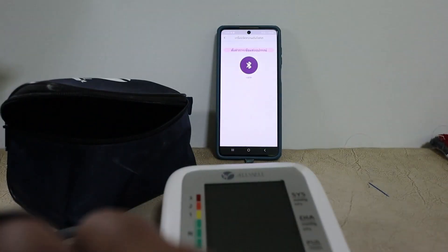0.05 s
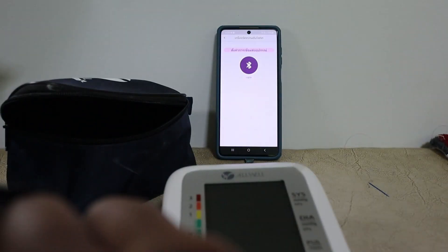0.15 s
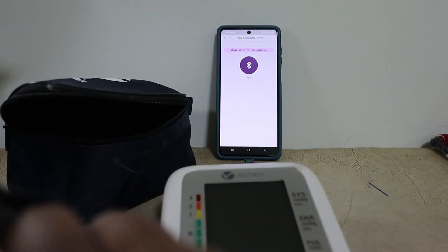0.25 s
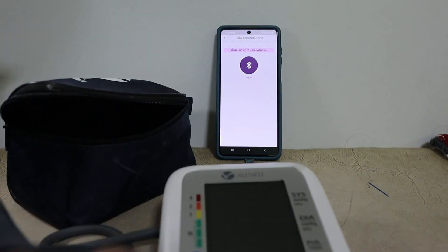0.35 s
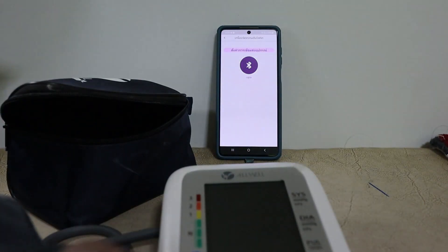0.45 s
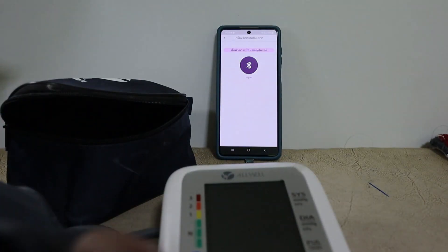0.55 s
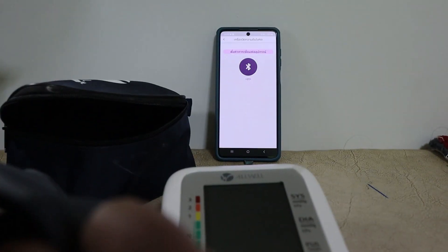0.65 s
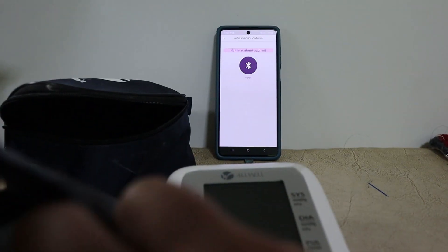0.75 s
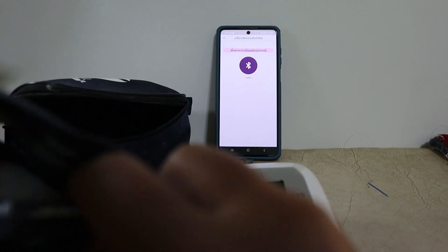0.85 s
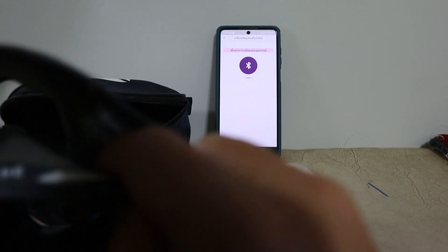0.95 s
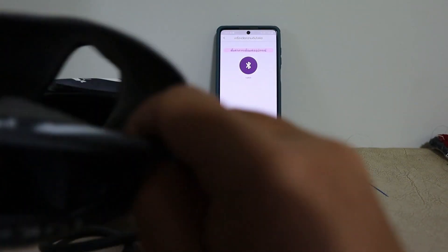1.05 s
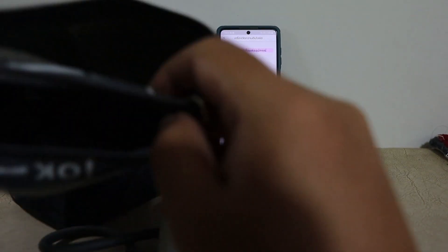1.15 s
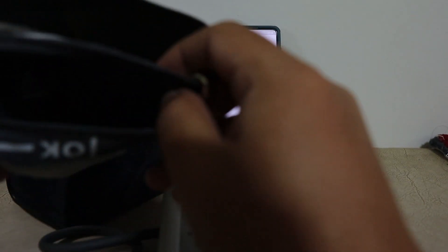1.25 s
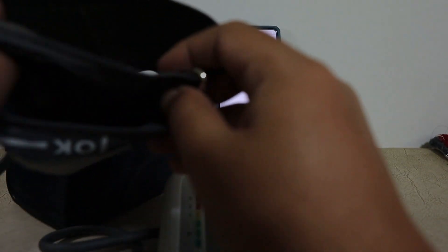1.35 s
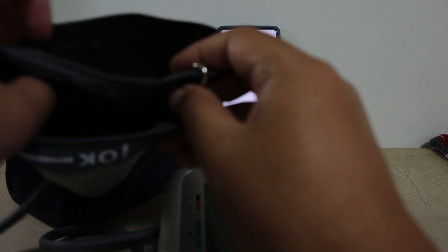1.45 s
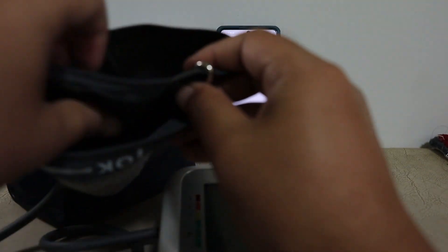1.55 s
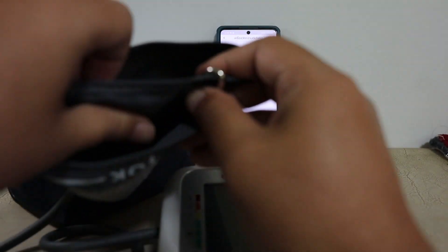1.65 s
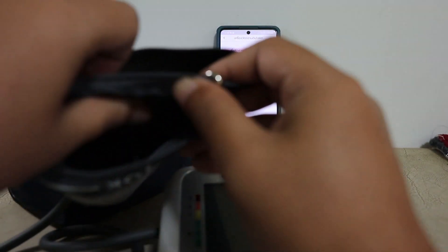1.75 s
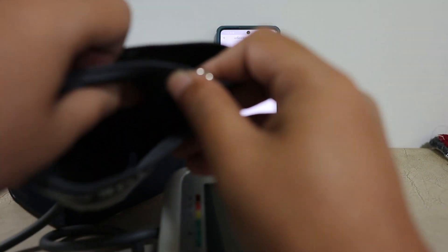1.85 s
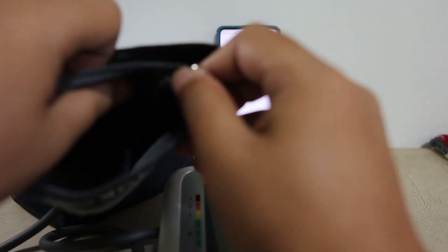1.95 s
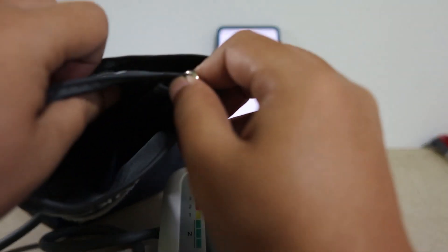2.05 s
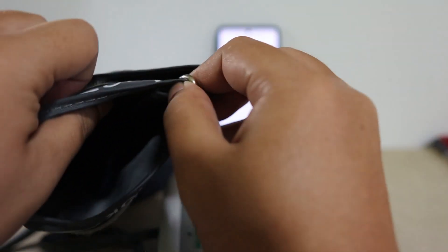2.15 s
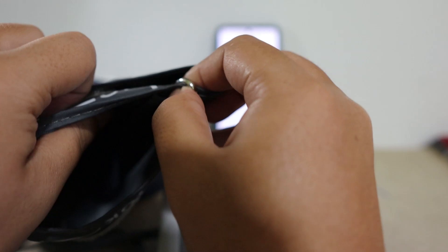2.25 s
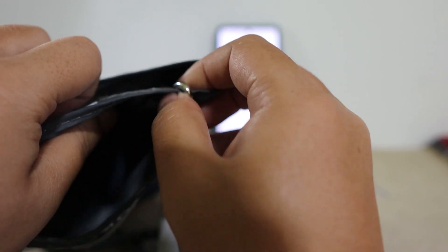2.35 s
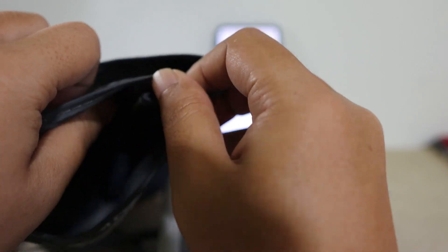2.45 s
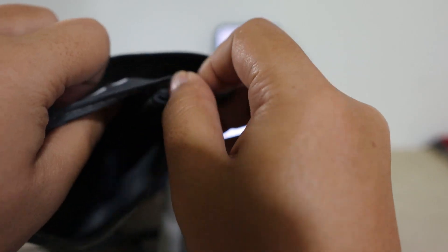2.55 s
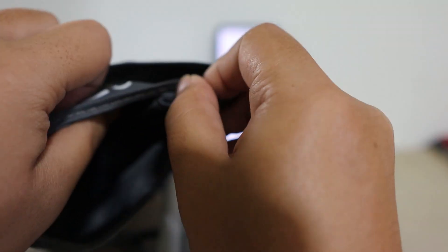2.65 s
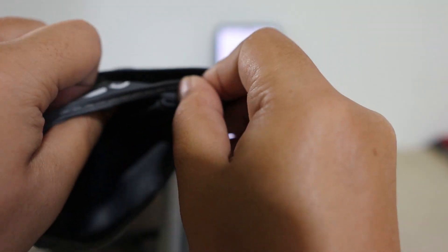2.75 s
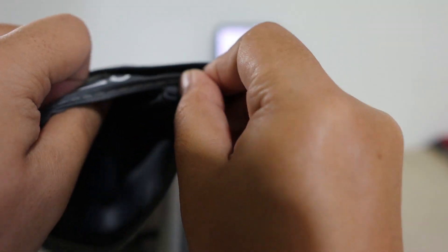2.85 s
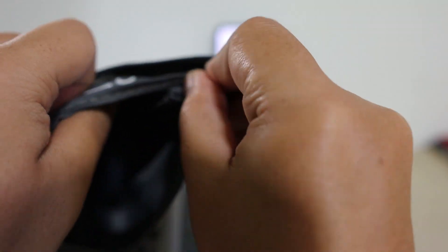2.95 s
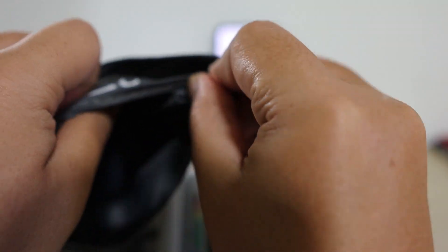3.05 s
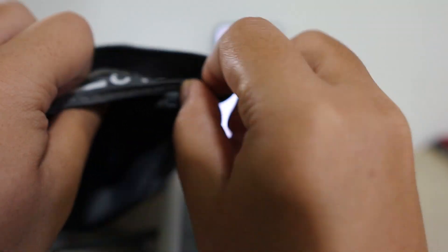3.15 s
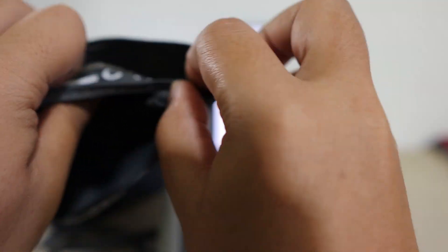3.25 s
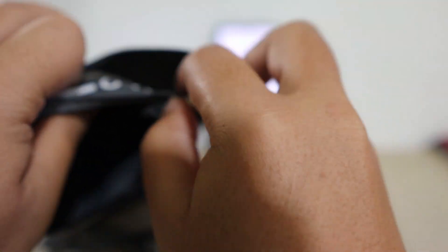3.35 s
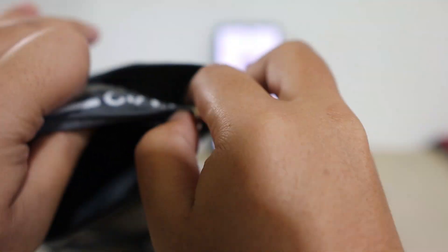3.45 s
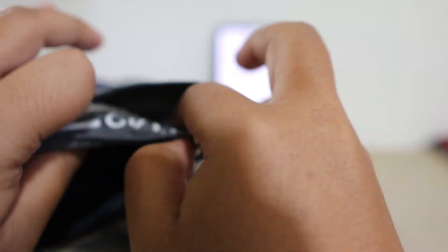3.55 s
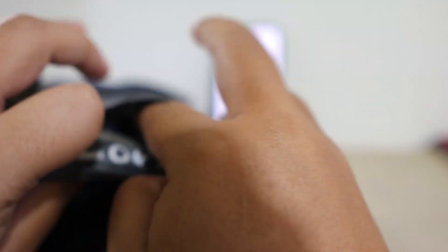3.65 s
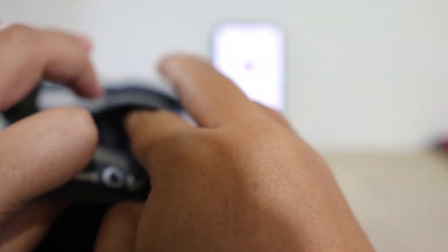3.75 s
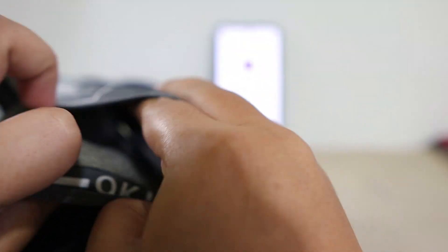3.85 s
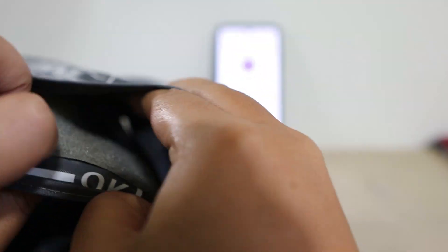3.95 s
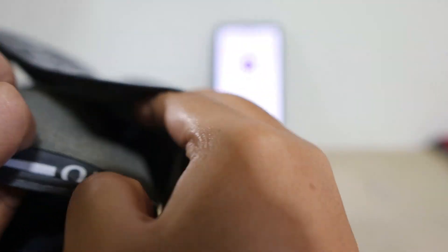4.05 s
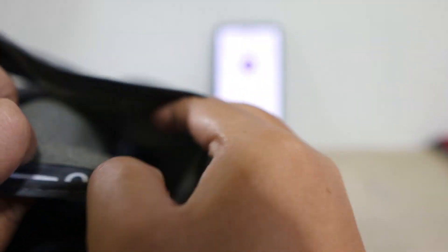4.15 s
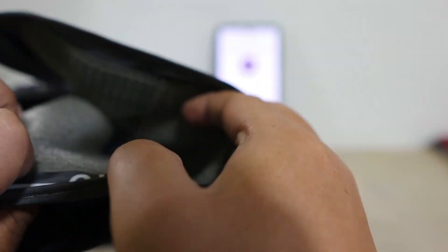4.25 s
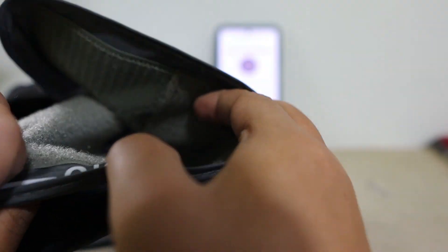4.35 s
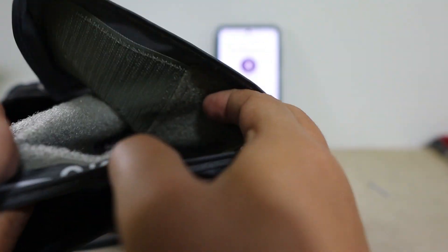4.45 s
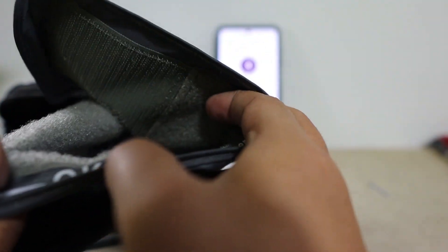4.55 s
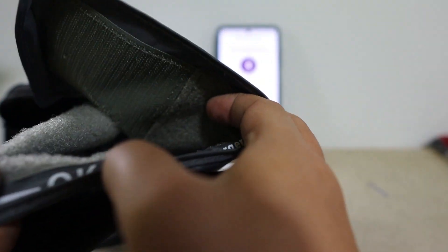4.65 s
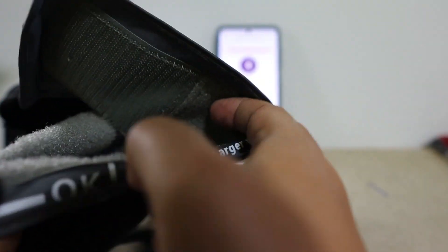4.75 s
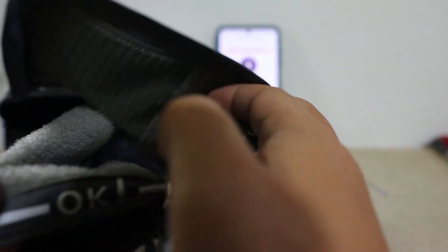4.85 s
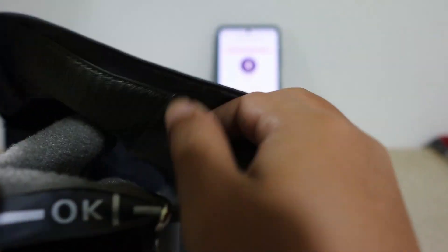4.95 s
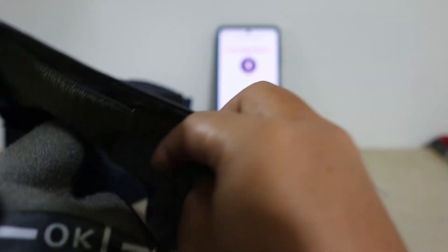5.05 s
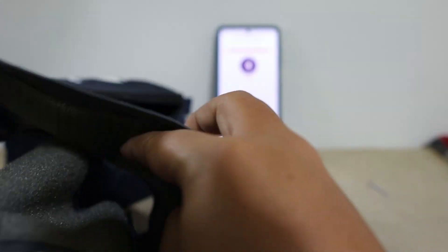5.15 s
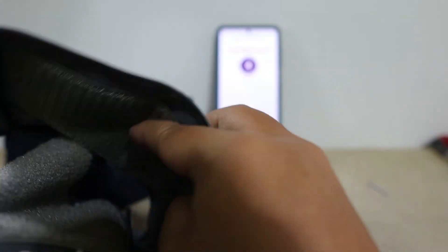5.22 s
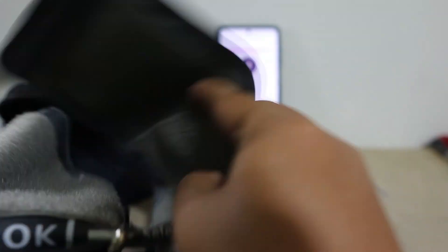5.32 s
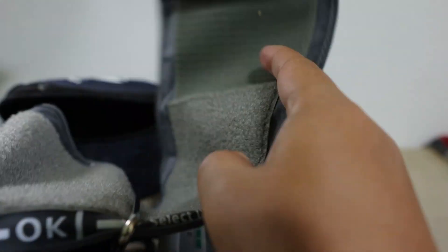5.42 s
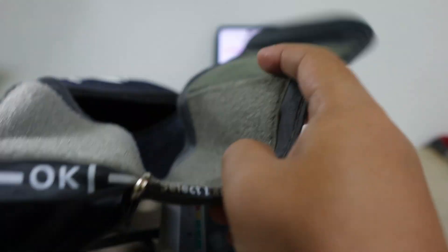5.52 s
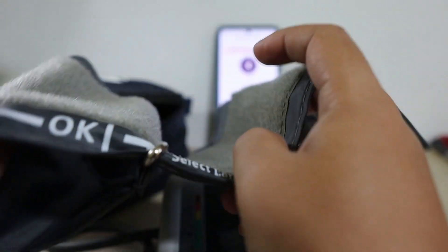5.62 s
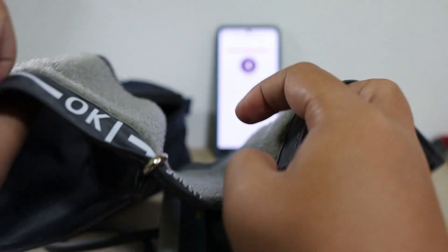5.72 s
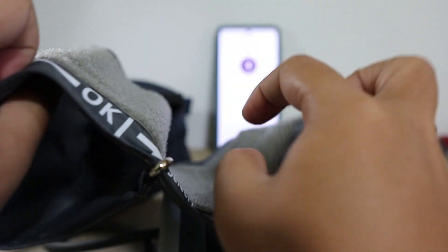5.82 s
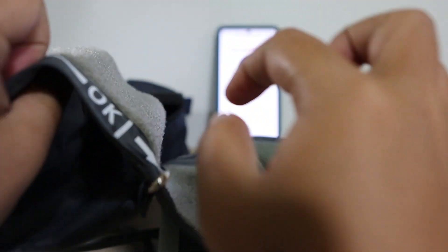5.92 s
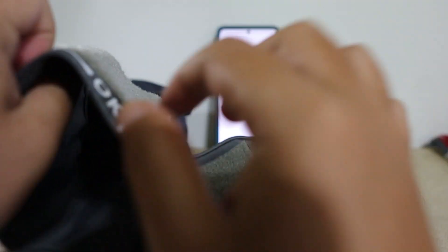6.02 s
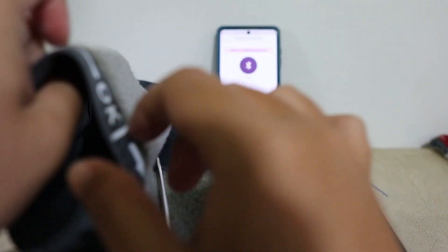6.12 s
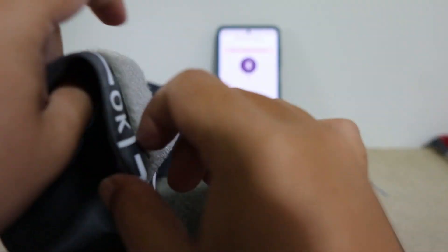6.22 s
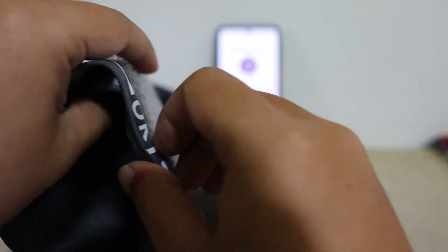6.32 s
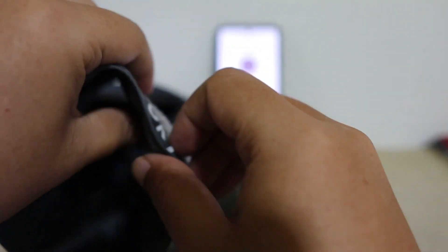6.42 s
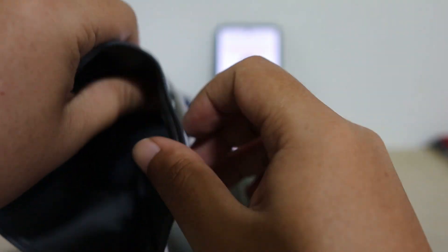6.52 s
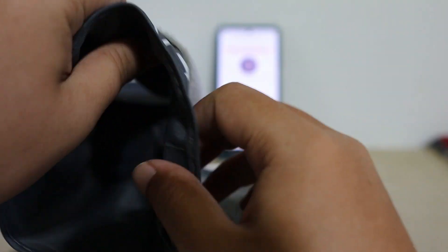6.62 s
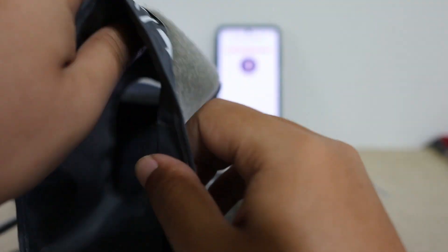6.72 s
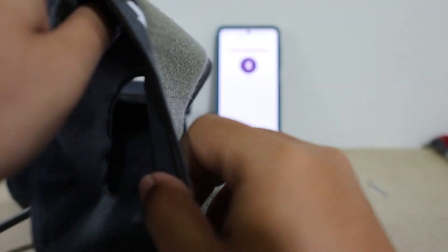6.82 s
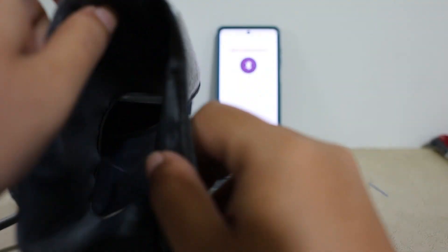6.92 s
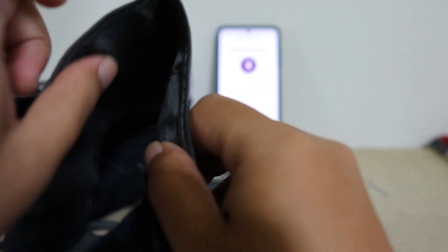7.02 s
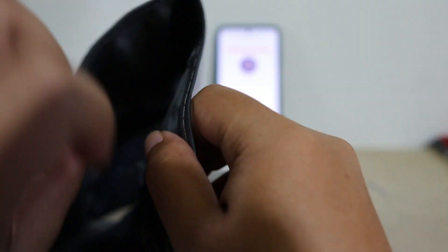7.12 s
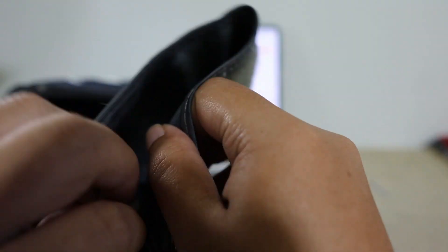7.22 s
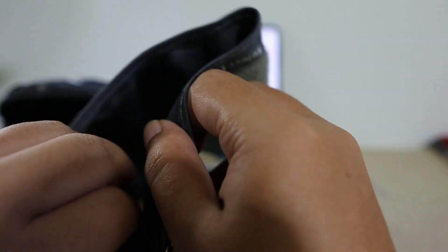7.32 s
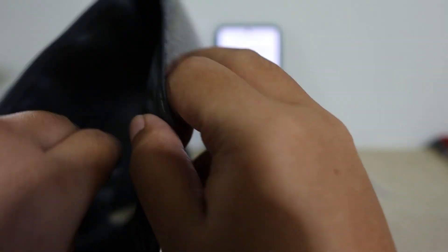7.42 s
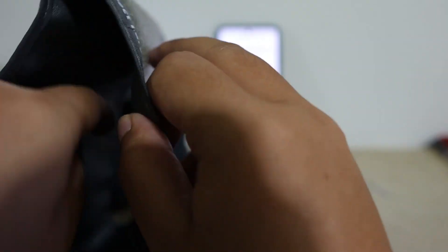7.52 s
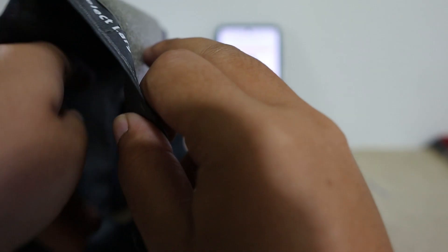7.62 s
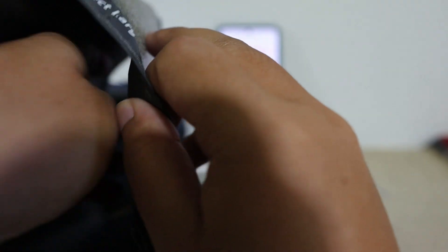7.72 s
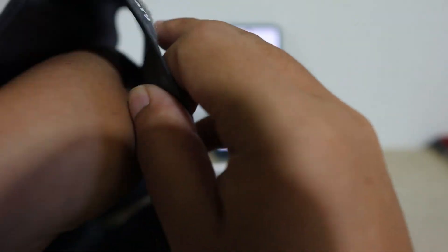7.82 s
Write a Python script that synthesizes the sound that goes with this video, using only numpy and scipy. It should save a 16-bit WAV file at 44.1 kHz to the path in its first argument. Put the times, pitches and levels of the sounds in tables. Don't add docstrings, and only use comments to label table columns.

```python
import sys
import numpy as np
from scipy import signal
from scipy.fft import rfft, irfft, next_fast_len
from scipy.io import wavfile
from scipy.ndimage import uniform_filter1d

SR = 44100
rng = np.random.default_rng(int(sys.argv[2]) if len(sys.argv) > 2 else 0)


def convert_level_to_amplitude(level_db):
    exponent = np.asarray(level_db, float) / 20
    return 10 ** exponent


def dump_mix(stems):
    frames = np.atleast_2d(stems).T
    limited = np.clip(frames, -1, 1)
    pcm = np.round(limited * 32767).astype(np.int16)
    wavfile.write(sys.argv[1], SR, pcm)


N = 347287
OPENED_S = 5.3


def rms_one(x):
    return x / np.sqrt(np.mean(x ** 2) + 1e-20)


def in_time(rows, quiet=None):
    s, *columns = np.transpose(rows)
    return [np.interp(np.arange(N) / SR, s, c, quiet, quiet) for c in columns]


def drift(rate):
    r = np.exp(-80 * np.pi * rate / SR)
    slow = signal.lfilter([1], [1, -2 * r, r * r], rng.standard_normal(N // 40 + 2002))[2000:]
    return np.interp(np.arange(N) / 40, np.arange(len(slow)), rms_one(slow))


def resonance(x, hz, width):
    r = np.exp(-np.pi * width / SR)
    poles = [1, -2 * r * np.cos(2 * np.pi * hz / SR), r * r]
    return signal.lfilter([(1 - r * r) / 2, 0, (r * r - 1) / 2], poles, x + 1e-18)


def body(drive, modes, shift_db, rate):
    total, power = 0, 0
    for k, (hz, width, db) in enumerate(modes):
        strength = convert_level_to_amplitude(db + shift_db * drift(rate))
        total = total + (-1) ** k * resonance(drive * strength, hz, width)
        power += convert_level_to_amplitude(db) ** 2 * np.pi * width / SR
    return total / np.sqrt(power)


def grains(per_s, spread_db):
    sizes = convert_level_to_amplitude(spread_db * np.minimum(rng.exponential(1, N), 4)) * rng.choice([-1, 1], N)
    return rms_one(sizes * (rng.random(N) < per_s / SR))


def room_tone():
    # (frequency [Hz], level per Hz [dB])
    air_spectrum = [(21, -24.5), (35, 15), (63, 3.5), (103, -5), (286, -10.5), (1090, -19), (1400, -23),
                    (1770, -21.5), (3180, -26.5), (6040, -43), (9100, -38), (12700, -36), (14400, -74.5),
                    (16000, -61.5)]
    # (time [s], low band level [dB], upper band level [dB])
    rumble = [(0, -49.5, -60), (1.1, -58.5, -64), (1.8, -62, -61.5), (2.2, -75.5, -68), (7.87, -67.5, -71)]
    hz = np.fft.rfftfreq(N, 1 / SR)[1:]
    corner_hz, corner_db = np.transpose(air_spectrum)
    shape = np.interp(np.log(hz), np.log(corner_hz), corner_db)
    air = rms_one(irfft(rfft(rng.standard_normal(N)) * np.append(0, convert_level_to_amplitude(shape)), N))
    low_db, upper_db = in_time(rumble)
    low = rms_one(resonance(resonance(rng.standard_normal(N), 65.3, 8.1), 65.3, 8.1))
    upper = rms_one(resonance(resonance(rng.standard_normal(N), 139.6, 35.0), 139.6, 35.0))
    return convert_level_to_amplitude(-54) * air + convert_level_to_amplitude(low_db - 4) * low + convert_level_to_amplitude(upper_db - 0.5) * upper


def rubbing():
    # (peak time [s], rise [s],
    # fall [s], padding level [dB], nylon skin level [dB])
    strokes = [(0.05, 0.34, 0.41, -51, -51.5), (0.22, 0.061, 0.065, -42, -41.5),
               (0.45, 0.74, 0.26, -56.5, -55.5), (0.636, 0.15, .22, -51.5, -56),
               (0.915, 0.029, 0.26, -56, -54.5), (1.01, 0.15, 0.061, -47, -47),
               (1.127, 0.027, 0.043, -52, -47.5), (1.26, 0.13, 0.11, -41, -42),
               (1.591, 0.22, 0.12, -44.5, -50.5), (1.755, 0.2, 0.064, -53, -58.5),
               (1.87, 0.065, 0.25, -57.5, -63.5), (2.058, 0.057, 0.27, -56.5, -62.5),
               (2.24, 0.12, 0.039, -57, -56), (2.31, 0.075, 0.034, -56.5, -60),
               (2.432, 0.038, 0.14, -58, -59.5), (2.557, 0.22, 0.94, -56, -63.5),
               (2.731, 0.22, 0.037, -74, -66.5), (2.936, 0.099, 0.18, -52.5, -58),
               (3.22, 0.17, 0.16, -51.5, -56), (3.35, 0.096, 0.34, -48, -51), (3.52, 0.26, 0.036, -56, -52),
               (3.634, 0.072, 0.021, -56, -62), (3.759, 0.28, 0.16, -59.5, -63.5),
               (3.942, 0.15, 0.42, -49.5, -55),
               (4.65, 0.81, 0.55, -50, -50), (5.056, 0.064, 0.027, -46, -47),
                 (5.161, 0.051, 0.22, -45, -48), (5.29, 0.32, 0.082, -51, -65),
                 (5.4, 0.16, 0.14, -46, -46.5), (5.56, .2, 0.23, -50, -53), (5.855, 0.14, 0.18, -51, -52),
                 (6.08, 0.043, 0.14, -52.5, -57.5), (6.276, 0.16, 0.15, -57, -54),
                 (6.473, 0.054, 0.36, -57.5, -59), (6.64, 0.3, 0.14, -62, -60),
                 (6.722, 0.093, 0.21, -46, -49.5), (6.887, 0.09, 0.14, -47.5, -49.5),
                 (7.076, 0.1, 0.08, -51, -51.5), (7.24, 0.15, 0.071, -59.5, -62),
                 (7.463, 0.062, 0.26, -49, -51.5), (7.61, 0.068, 0.055, -62, -58.5),
                 (7.76, 0.068, 0.11, -51.5, -58), (7.87, 0.21, .1, -56.5, -46.5)]
    drop_db, roundness = 18, 1.365
    t = np.arange(0, N + 64, 64) / SR
    s, rise, fall, padding_db, skin_db = np.transpose(strokes)[:, :, None]
    swell_db = -drop_db * np.where(t < s, (s - t) / rise, (t - s) / fall) ** roundness

    def envelope(db, rest_db):
        power = convert_level_to_amplitude(rest_db) ** 2 + np.sum(convert_level_to_amplitude(db + swell_db) ** 2, axis=0)
        return np.interp(np.arange(N) / SR, t, np.sqrt(power))

    padding, skin = envelope(padding_db, -72.5), envelope(skin_db, -76)
    slide = convert_level_to_amplitude(0.87 * drift(24) + 2.36 * drift(170))
    drive = slide * (0.9 * rng.standard_normal(N) + 0.3 * grains(900, 3.5))
    return padding * drive, skin * drive


def hollow_cuff(rub, hook, knock):
    # (frequency [Hz], width [Hz], level [dB])
    hollow_modes = [(175, 100, -12), (316, 59, -6), (478, 202, -6), (753, 264, -3.5), (1057, 112, -0.5),
                    (1235, 114, -3), (1388, 516, -13)]
    t = np.arange(N) / SR
    opened_hook = hook * (t > OPENED_S)
    blunt_knock = uniform_filter1d(knock, size=15, origin=7)
    hollow = body(rub + convert_level_to_amplitude(-1.5) * hook + blunt_knock, hollow_modes, shift_db=1.5, rate=15)
    hollow = hollow + convert_level_to_amplitude(14.0) * resonance(opened_hook, 386, 190)
    hollow = hollow + convert_level_to_amplitude(7.0) * resonance(hook, 1070, 73)
    hollow = hollow + convert_level_to_amplitude(3) * resonance(opened_hook, 284, 90)
    hollow = hollow + convert_level_to_amplitude(-3.5) * resonance(hook, 430, 100)
    return hollow + convert_level_to_amplitude(-14) * resonance(hook * (t > 4.85), 1770, 610)


def nylon_skin(rub, hook, crack):
    # (frequency [Hz], width [Hz], level [dB])
    skin_modes = [(2380, 920, -17), (3180, 790, 0.5), (5000, 1310, -2.5), (5970, 970, -2.5),
                  (8720, 2100, -7.5), (10330, 290, -4.5), (12900, 5700, -13)]
    opened_hook = hook * (np.arange(N) > OPENED_S * SR)
    skin = body(rub + convert_level_to_amplitude(-0.5) * hook + convert_level_to_amplitude(-11) * crack, skin_modes, shift_db=1.4, rate=14)
    skin = skin + strap_sheen(hook)
    skin = skin + convert_level_to_amplitude(9.0) * resonance(opened_hook, 5640, 1540)
    return skin - convert_level_to_amplitude(-4) * resonance(hook, 3320, 410) + convert_level_to_amplitude(-10) * crack


def room(x):
    t60_s, wall_cut_hz = 0.22, 9200
    size = next_fast_len(N + SR)
    hz, sound = np.fft.rfftfreq(size, 1 / SR), rfft(x, size)
    dull, paths = 1 / (1 + 1j * hz / wall_cut_hz), []
    for lag in rng.uniform(0.007, 0.028, 8):
        loop = convert_level_to_amplitude(-60 * lag / t60_s) * dull * np.exp(-2j * np.pi * hz * lag)
        paths.append(loop / (1 - loop))
    alike = irfft(sound * sum(paths[:6]), size)[:N]
    side_band = hz / (hz + 70) / (1 + hz / 1500)
    unlike = irfft(sound * (paths[6] - paths[7]) * side_band, size)[:N]
    return convert_level_to_amplitude(-17.5) * (alike + convert_level_to_amplitude(-12.0) * unlike * [[1], [-1]])


def snaps():
    # (time [s], peak level [dB], pitch [Hz], skin level [dB])
    creases = [(0.021, -41.5, 1310, 16.5), (0.215, -32, 1200, 3.5), (0.23, -32, 700, -11),
               (0.372, -29.5, 536, -10), (0.576, -26.5, 516, -12), (0.647, -37.5, 666, -22),
               (0.797, -32.5, 690, -13), (1.167, -32, 1050, -27), (1.26, -34, 1050, -16),
               (1.755, -23, 820, -13), (1.934, -29.5, 820, -20), (2.225, -28, 905, -14),
               (2.324, -40, 900, -8), (3.045, -35.5, 930, -40), (3.605, -33, 980, -8),
               (5.019, -31.5, 1190, -27), (5.171, -25.5, 910, -10), (5.287, -43, 1180, -29.5),
               (5.82, -34, 940, -6), (6.105, -27, 550, -25), (6.814, -36, 729, -11),
               (7.069, -36.5, 935, -9), (7.178, -30.5, 322, -20), (7.535, -27, 336, -18),
               (7.605, -39, 686, -20)]
    knocks = [
        (0.897, -14, 1010, -10),
        (1.173, -24.5, 510, -41),
        (2.129, -39, 1043, -31),
        (2.266, -34, 1040, -29),
        (6.088, -36.5, 305, 3.5),
        (6.712, -32.5, 733, 5),
        (7.692, -43, 1050, -29),
    ]
    # (time [s], peak level [dB], pitch [Hz], skin level [dB], skin pitch [Hz])
    folds = [
        (1.246, -41.5, 990, 8, 5230),
        (2.919, -46.5, 929, 5.5, 8000),
        (4.8702, -7, 1470, 0, 2900),
        (6.049, -32.5, 674, 6.5, 3930),
        (6.585, -37, 524, -5, 4600),
        (6.864, -25, 1000, -2, 1870),
    ]
    # (time [s], peak level [dB], pitch [Hz],
    # skin level [dB])
    hook_pops = [(3.3597, -21.5, 725, -9), (3.4312, -29, 920, 17), (3.4403, -19.5, 940, -1),
                 (3.4545, -22, 835, 3), (3.9834, -22, 1060, -16), (4.055, -18, 1000, -5),
                 (4.1713, -36, 904, -4), (4.1806, -24, 820, 1), (4.186, -14.5, 805, 2),
                 (4.1997, -13, 1005, -1), (4.2071, -20, 1004, -3), (4.2179, -20, 1020, -2),
                 (4.226, -26, 1070, -3), (4.2323, -28, 950, 2),
                 (4.2879, -15, 860, -9), (4.2979, -31, 950, -4), (4.3068, -17, 830, 4),
                (4.3247, -18.5, 960, 6.5), (4.3324, -7.5, 930, -4), (4.3407, -5, 885, -22),
                (4.3451, -5, 980, 0), (4.3576, -10, 960, -12), (4.367, -17, 990, -3), (4.3977, -22, 870, 7),
                (4.4048, -8, 980, 3), (4.4127, -17, 840, -3), (4.4449, -21, 990, -5), (4.472, -16, 840, 2),
                (4.478, -18, 806, 10), (4.4883, -8.5, 890, -10), (4.4968, -18.5, 920, -5),
                (4.5087, -15, 1020, -12), (4.5526, -11, 840, -7), (4.5645, -21, 885, -4),
                 (4.5914, -24, 890, -5.5), (4.5992, -15, 850, 0.5), (4.6131, -18, 1000, -12.5),
                 (4.6217, -14, 920, -1), (4.6286, -17.5, 844, 7), (4.6377, -21, 920, 5.5),
                 (4.6424, -16, 935, -12), (4.6632, -11.5, 900, 1.5), (4.7198, -24.5, 880, -4),
                 (4.7326, -18, 1030, -0.5), (4.7459, -17, 1030, -9.5), (4.7527, -10.5, 1030, -14.5),
                 (4.7611, -11.5, 890, -7.5), (4.7863, -12, 950, -16), (4.8064, -28, 860, -7),
                 (4.813, -21, 1080, -11), (4.8284, -17.5, 930, -2.5), (4.8329, -17.5, 950, -3.5),
                 (4.8553, -14, 910, 4.5), (4.86, -14.5, 820, -8.5), (4.8655, -19.5, 930, -13),
                 (4.8702, -8, 980, -19), (4.8796, -8, 1070, -11.5), (4.8848, -21, 1000, 3.5),
                 (4.8966, -26.5, 840, -6.5), (4.9135, -28.5, 930, -16),
                 (5.4021, -21, 766, -2), (5.408, -13, 835, -2), (5.4229, -13.5, 720, -7),
                 (5.4334, -7, 870, 1), (5.4386, -19, 825, -6), (5.4459, -27, 770, 6), (5.4551, -17, 764, 5),
                 (5.4592, -7, 726, 4), (5.464, -2.5, 1015, -5), (5.4731, -4.5, 603, 3.5),
                 (5.4833, -1.5, 930, -21), (5.4893, -12.5, 980, 0), (5.508, -24, 990, 4),
                 (5.5206, -21, 1060, 0)]
    crease_t60_s, knock_t60_s, pop_t60_s = 0.0075, 0.03, 0.017
    crack_hz, crack_ring = 3460, 0.92
    rise_s, partner_ratio, partner_db = 0.00036, 0.81, -14.5

    rows = [row + (crack_hz, crease_t60_s) for row in creases]
    rows += [row + (crack_hz, knock_t60_s) for row in knocks]
    for s, peak_db, hz, skin_db in hook_pops:
        rows.append((s, peak_db - 1, hz, skin_db - 8, crack_hz, pop_t60_s))
    rows += [row + (crease_t60_s,) for row in folds]

    thud, knock, crack = np.zeros((3, N))
    t = np.arange(int(0.05 * SR)) / SR
    grit = rng.standard_normal(N + len(t))
    for s, peak_db, hz, skin_db, skin_hz, t60 in rows:
        at = round((s + 0.002186) * SR)
        span = slice(at, at + len(t))
        ring = np.sin(2 * np.pi * hz * t) * convert_level_to_amplitude(-60 * t / t60)
        partner = np.sin(2 * np.pi * partner_ratio * hz * t) * convert_level_to_amplitude(-45 * t / t60)
        ring = (ring + convert_level_to_amplitude(partner_db) * partner) * (1 - np.exp(-t / rise_s)) ** 2
        ring = ring / np.max(np.abs(ring))
        spray = grit[span] * np.exp(-t / 0.0017)
        poles = [1, -2 * crack_ring * np.cos(2 * np.pi * skin_hz / SR), crack_ring ** 2]
        spit = signal.lfilter([1], poles, spray)
        spit = spit / np.max(np.abs(spit))
        thud[span] += (convert_level_to_amplitude(peak_db - 3.5) * ring)[:N - at]
        knock[at] += convert_level_to_amplitude(peak_db + 4.5) * crease_t60_s / t60
        crack[span] += (convert_level_to_amplitude(peak_db + skin_db + 6.5) * spit)[:N - at]
    return thud, knock, crack


def ticks():
    # (time [s], peak level [dB])
    threads = [(0.425, -40), (0.4334, -38), (0.443, -41), (0.7854, -34.5), (2.33, -46), (2.3815, -43),
               (3.376, -38), (3.409, -40), (3.606, -44), (3.6586, -39), (6.6772, -37), (7.6394, -57)]
    starts = np.zeros(N)
    for s, peak_db in threads:
        starts[round((s + 0.001) * SR)] = convert_level_to_amplitude(peak_db - 3)
    starts += convert_level_to_amplitude(-55 + 3 * rng.standard_normal(N)) * (rng.random(N) < 14 / SR)
    decay = np.exp(-1 / (0.00092 * SR))
    spit = signal.lfilter([1], [1, -decay], starts + 1e-18) * rng.standard_normal(N)
    return signal.sosfilt(signal.butter(2, 2800, "high", fs=SR, output="sos"), spit)


def squeak():
    # (time [s], pitch [Hz], level [dB], level of the higher strand [dB])
    whistle = [
        (3.04, 9200, -80, -95),
        (3.07, 10200, -73, -95),
        (3.1, 10800, -69, -92),
        (3.15, 10900, -70, -88),
        (3.21, 11300, -67, -84),
        (3.28, 11700, -63, -73),
        (3.315, 11250, -66, -63),
        (3.37, 10950, -72, -64),
        (3.43, 10800, -72, -64),
    ]
    hz = in_time(whistle)[0]
    level_db, high_db = in_time(whistle, quiet=-200)[1:]
    wavering_hz = uniform_filter1d(hz, size=900) + 8 * drift(150) + 25 * drift(25)
    phase = 2 * np.pi * np.cumsum(wavering_hz) / SR
    low = np.sin(phase) + 0.45 * np.sin(0.93 * phase)
    low = low + 0.6 * np.sin(0.775 * phase) + 0.2 * np.sin(1.035 * phase)
    high = np.sin(1.12 * phase)
    return convert_level_to_amplitude(level_db + 3.0 * drift(40)) * low + convert_level_to_amplitude(high_db + 3.0 * drift(40)) * high


def strap_sheen(hook):
    # (time [s], level [dB])
    sheen = [(3.3, -32), (4.0, -15), (4.42, -7), (4.6, -43), (5.6, 2.5)]
    return convert_level_to_amplitude(in_time(sheen)[0]) * resonance(hook, 12800, 3300)


def strays():
    # (start [s], end [s], level [dB])
    pulls = [
        (3.377, 3.43, -57),
        (3.955, 4.26, -53),
        (4.36, 4.95, -47),
        (5.379, 5.56, -54),
    ]
    gap_s, length_ms = 0.012, 20
    luck, step = rng.uniform(-1, 1, (len(pulls), 50, 3)), np.arange(50)
    rows = []
    for (start, end, db), chance in zip(pulls, luck):
        times = start + gap_s * (step + chance[:, 0] / 2)
        for s, b, c in zip(times, chance[:, 1], chance[:, 2]):
            if s < end:
                rows.append((s, length_ms * (1 + b / 2), db + 1.5 * c))
    return rows


def hooks():
    # (time [s], length [ms], cuff thump level [dB])
    tug = [
        (3.323, 20, -47),
        (3.3583, 5.3, -23),
        (3.374, 3.6, -51),
        (3.428, 20.4, -25),
        (3.439, 6.2, -24),
        (3.453, 7.6, -30.5),
        (3.477, 16, -39.5),
    ]
    peel = [(3.932, 5.3, -40), (3.947, 6.5, -37), (3.982, 4.1, -35.5), (4.013, 7.1, -36), (4.0284, 13, -41),
            (4.0562, 4, -29), (4.0805, 5.9, -31.5), (4.1397, 5.8, -35.5), (4.1627, 2.4, -29.5),
            (4.17, 3.9, -32), (4.1806, 10.3, -27.5), (4.2011, 1.3, -22), (4.208, 3.6, -35),
            (4.2167, 2.3, -26.5), (4.23, 4.3, -32), (4.2478, 2.2, -32), (4.268, 4.3, -25),
            (4.2756, 3.5, -27), (4.2863, 7.3, -22.5), (4.295, 8.2, -17.5), (4.303, 6.1, -22.5)]
    rip = [(4.3225, 8, -23), (4.3292, 11, -17), (4.3376, 10, -15.5), (4.345, 15, -16), (4.357, 7.3, -27),
           (4.377, 8.3, -47), (4.395, 10, -21.5), (4.402, 5.7, -18.5), (4.413, 3.4, -16),
           (4.4447, 3.2, -16), (4.46, 5.4, -28.5), (4.4722, 8.6, -21.5), (4.4874, 8.5, -14.5),
           (4.507, 4.8, -23.5), (4.5282, 2.1, -36), (4.552, 21, -21.5), (4.5668, 3.6, -32),
           (4.5823, 9, -27.5), (4.592, 7.6, -19), (4.6139, 4.5, -22.5), (4.6225, 3.7, -28),
           (4.6267, 13, -20), (4.638, 11, -21), (4.6627, 5.1, -22),
           (4.6857, 9.3, -26.5), (4.707, 3.9, -31), (4.7186, 10, -21), (4.7318, 2.5, -16.5),
               (4.745, 5.4, -37), (4.7524, 14, -21), (4.762, 12, -25), (4.786, 5.1, -18),
               (4.806, 5.7, -24.5), (4.8144, 6.7, -17), (4.8254, 6.2, -21), (4.84, 28, -24),
               (4.856, 33, -17.5), (4.87, 0.87, -28), (4.876, 22, -21.5), (4.898, 5.4, -51),
               (4.913, 9.6, -22.5), (4.935, 10, -40), (4.955, 13, -40)]
    last_rip = [(5.382, 17, -48), (5.402, 2.4, -21.5), (5.4082, 1.7, -16), (5.423, 2.2, -17.5),
                (5.4316, 6.9, -18.5), (5.4437, 11, -26.5), (5.454, 18, -15.5), (5.461, 14, -14.5),
                (5.468, 12, -13), (5.506, 8.8, -36), (5.52, 19, -35), (5.54, 15, -44)]
    # (time [s], skin crack against cuff thump [dB])
    taut = [(3.33, 0.5), (3.45, 2.5), (3.95, 0), (4.2, 5), (4.35, -0.5), (4.57, 0), (4.62, -4), (4.9, -5),
            (5.45, -5)]
    low, jerks = np.zeros(N), strays() + tug + peel + rip + last_rip
    for s, length_ms, thump_db in jerks:
        at, size = round((s + 0.0018) * SR), round((length_ms - 0.8) * SR / 1000)
        sag = np.linspace(0.9, 0.8, size) + 0.33 * np.exp(-np.arange(size) / (0.0006 * SR))
        low[at:at + size] = convert_level_to_amplitude(thump_db - 3) * sag
    fade = np.exp(-1 / (0.0083 * SR))
    lingering = 0.85 * signal.lfilter([1 - fade], [1, -fade], low + 1e-18)
    pops = grains(3500, 3.6) * convert_level_to_amplitude(2.2 * drift(400))
    first = np.round((np.array(jerks)[:, 0] + 0.0013) * SR).astype(int)
    pops[first] = 2.2
    low = pops * np.maximum(low, lingering)
    high = low - 0.37 * resonance(low, 2250, 900) - 0.41 * resonance(low, 4360, 800)
    return low, high * convert_level_to_amplitude(in_time(taut)[0])


def flexing():
    # (time [s], level [dB])
    pumps = [
        [(3.33, -60), (3.48, -60), (3.52, -57)],
        [(3.95, -81), (4.32, -61.5), (4.89, -48), (4.95, -87)],
        [(5.38, -60), (5.474, -36), (5.58, -93)],
    ]
    band = signal.butter(2, [80, 230], "band", fs=SR, output="sos")
    puff = rms_one(signal.sosfilt(band, rng.standard_normal(N)))
    return puff * sum(convert_level_to_amplitude(in_time(rows, quiet=-200)[0] - 2.5) for rows in pumps)


def scene():
    rub_low, rub_high = rubbing()
    hook_low, hook_high = hooks()
    thud, knock, crack = snaps()
    hollow = hollow_cuff(rub_low, hook_low, knock)
    skin = nylon_skin(rub_high, hook_high, crack) + ticks()
    cuff = hollow + skin + thud + flexing() + squeak()
    lean = resonance(hollow + thud, 1000, 2600) * convert_level_to_amplitude(-25) + skin * convert_level_to_amplitude(-30) * drift(40)
    return cuff + lean * [[-1], [1]] + room(cuff) + room_tone()


def band_limit(x):
    return signal.sosfilt(signal.butter(12, 16480, fs=SR, output="sos"), x)


def record(dry):
    # (low edge [Hz], level [dB])
    top_bands = [(12800, -69), (13900, -70), (14900, -68)]
    bass_cut = signal.butter(8, 43, "high", fs=SR, output="sos")
    top_cut = signal.cheby2(10, 65, 16300, fs=SR, output="sos")
    out = signal.sosfilt(np.vstack([bass_cut, top_cut]), 0.96 * np.tanh(dry / 0.83))
    sound, hz = rfft(out), np.fft.rfftfreq(N, 1 / SR)
    treble = irfft(sound[0] * (hz > 8000) * (hz < 12000), N)
    power = uniform_filter1d(treble ** 2, size=1024)[::1024]
    power = power * convert_level_to_amplitude(5 * rng.standard_normal(len(power)))
    for edge_hz, gate_db in top_bands[::-1]:
        closed = np.repeat(power < convert_level_to_amplitude(2 * gate_db), 1024)[:N]
        shut = uniform_filter1d(closed * 0.93, size=512)
        out = out - shut * irfft(rfft(out) * (hz > edge_hz), N)
    return band_limit(out)


dry = scene()
out = record(dry)
dump_mix(out)
```